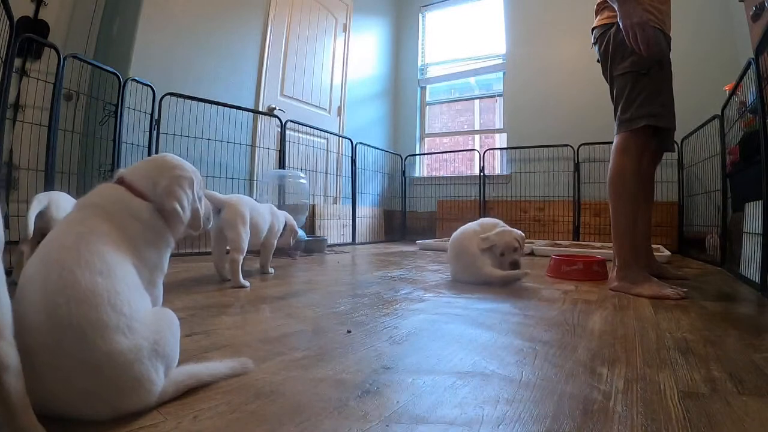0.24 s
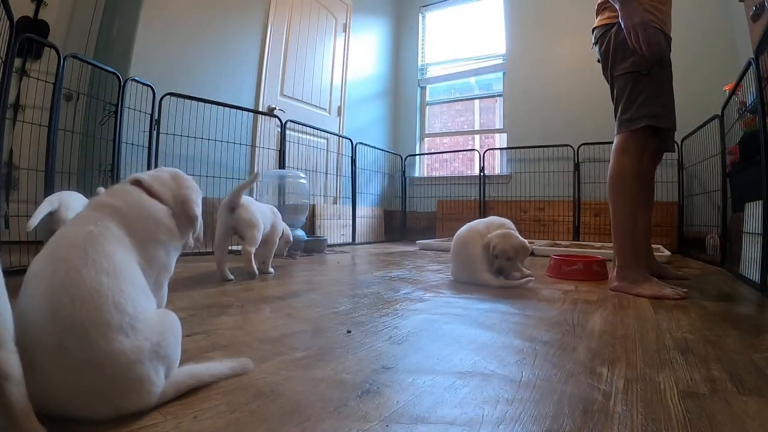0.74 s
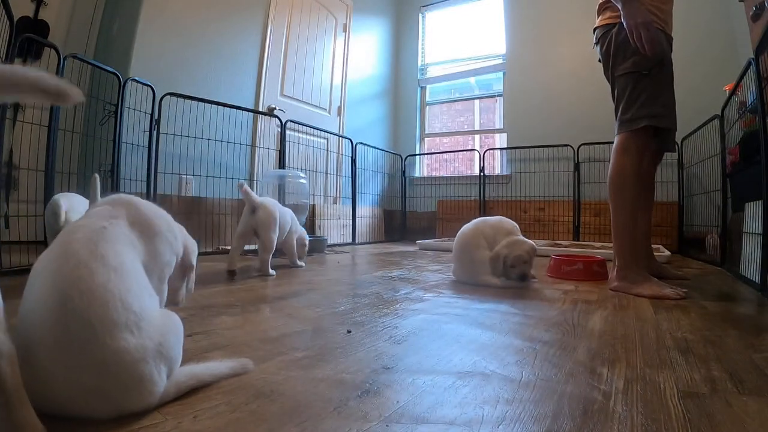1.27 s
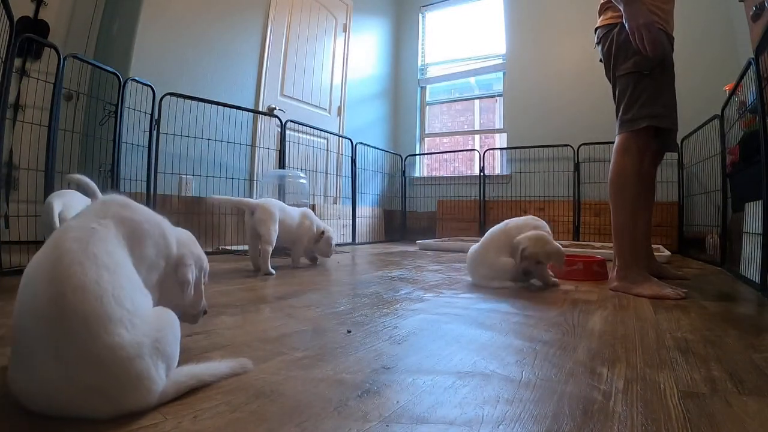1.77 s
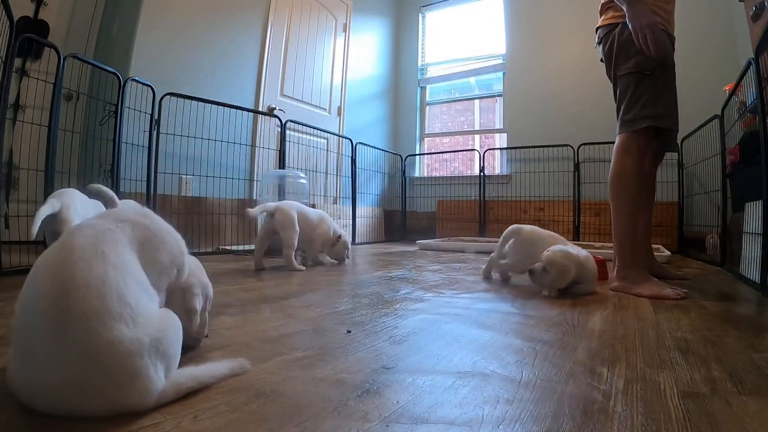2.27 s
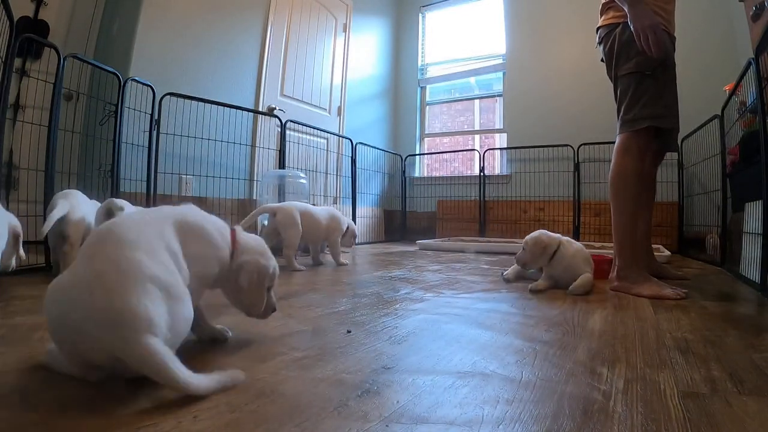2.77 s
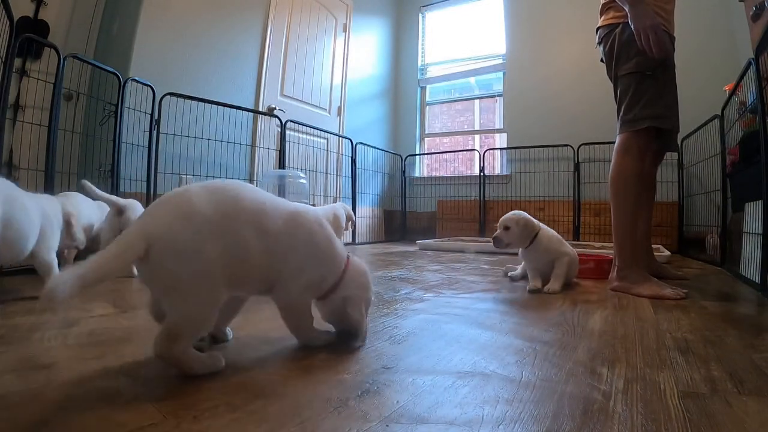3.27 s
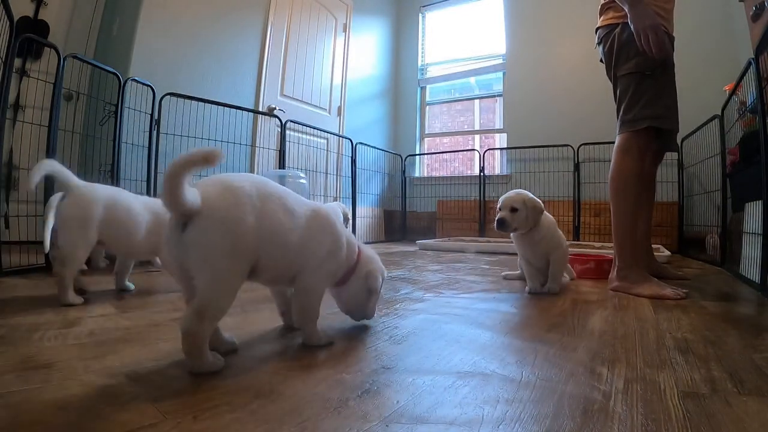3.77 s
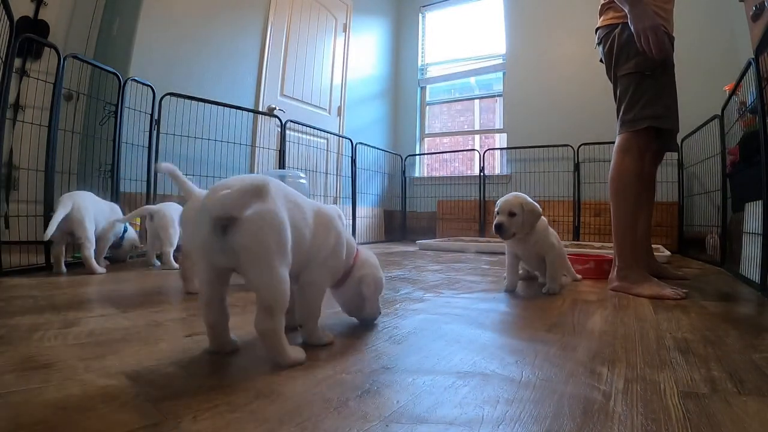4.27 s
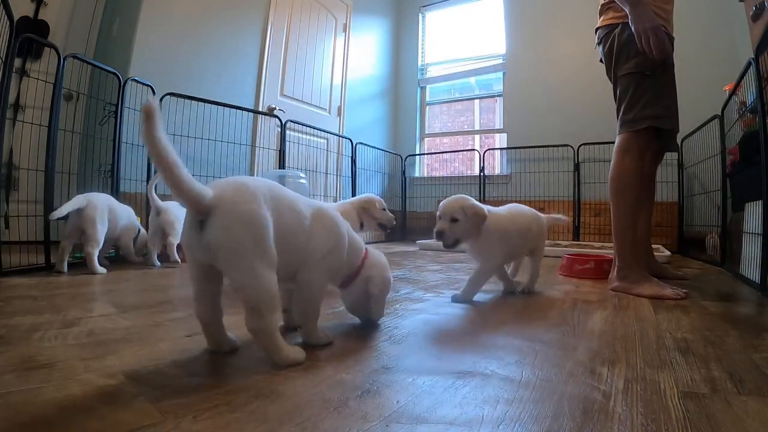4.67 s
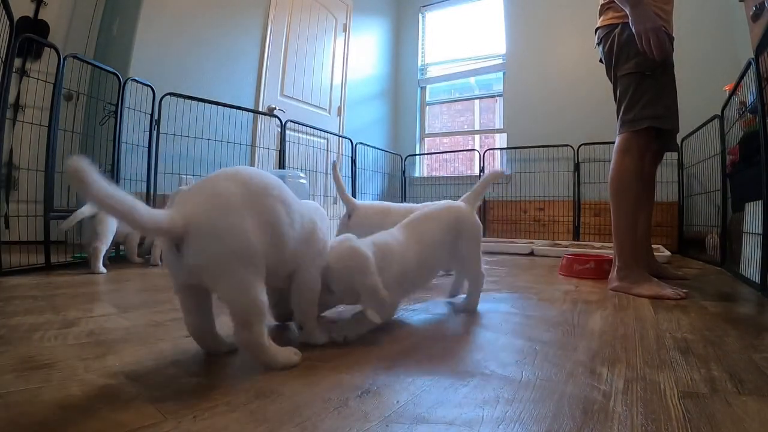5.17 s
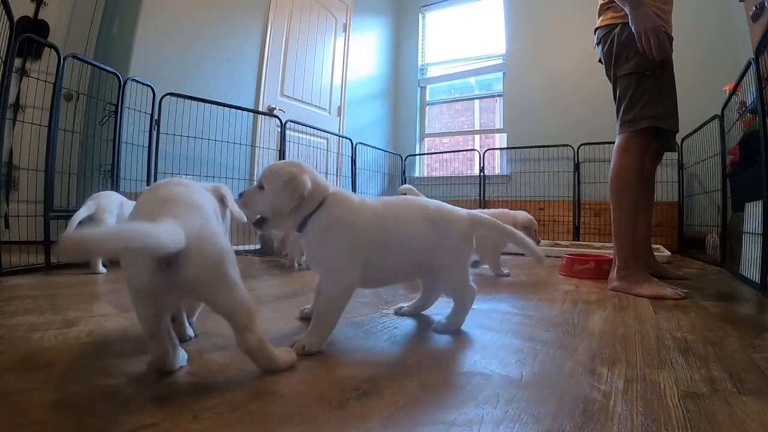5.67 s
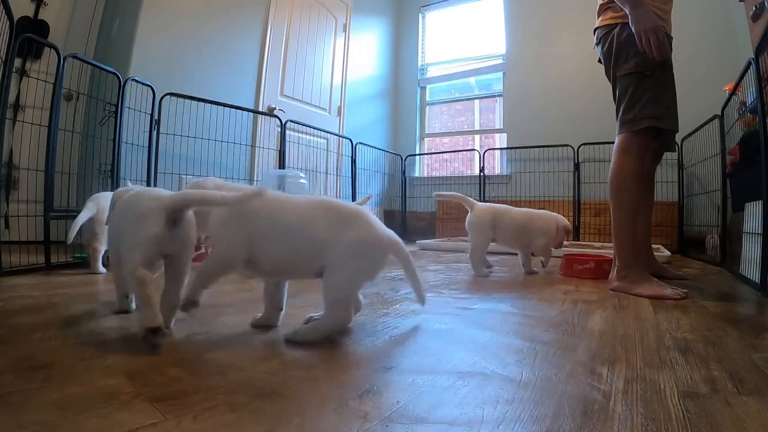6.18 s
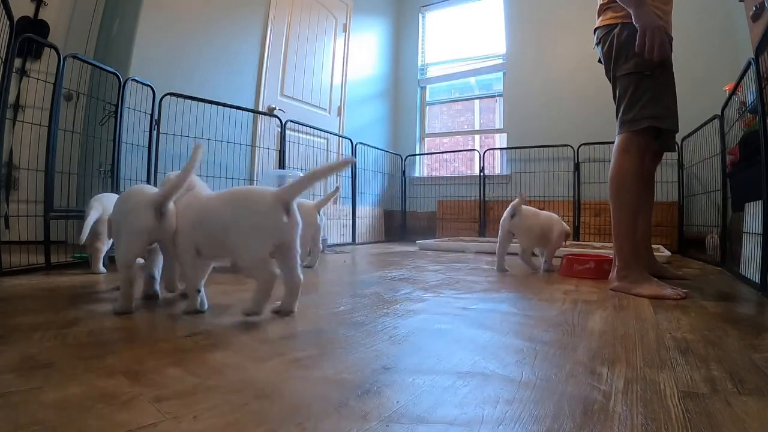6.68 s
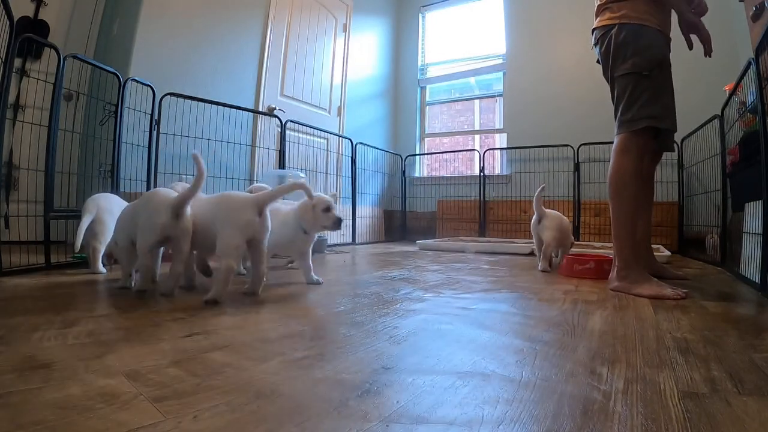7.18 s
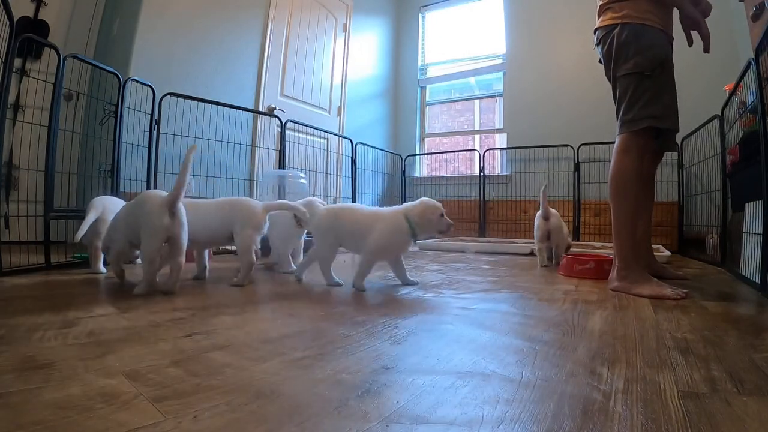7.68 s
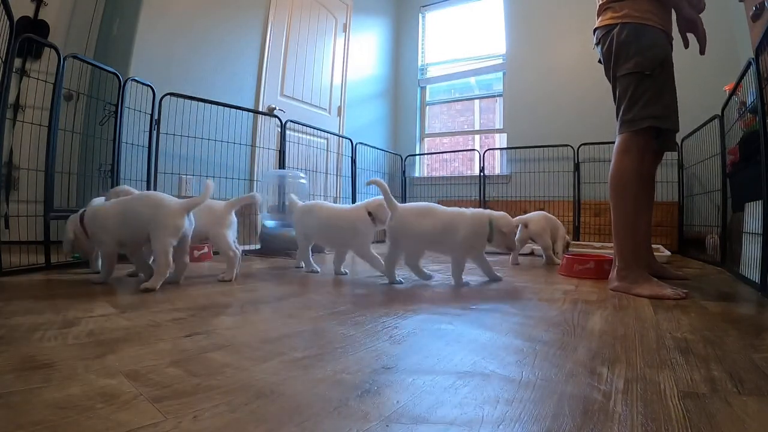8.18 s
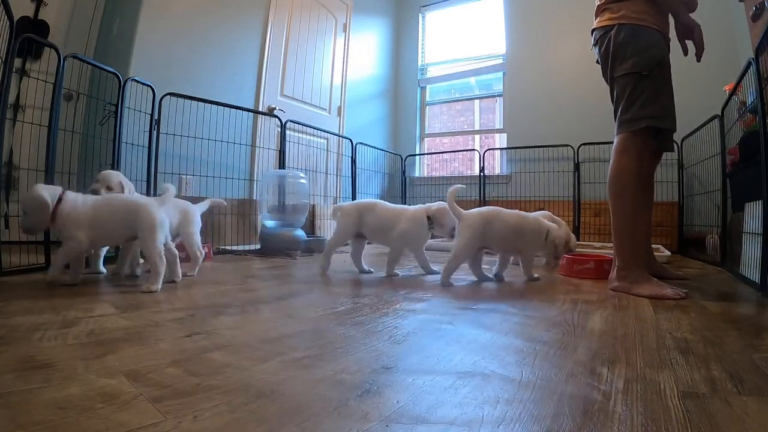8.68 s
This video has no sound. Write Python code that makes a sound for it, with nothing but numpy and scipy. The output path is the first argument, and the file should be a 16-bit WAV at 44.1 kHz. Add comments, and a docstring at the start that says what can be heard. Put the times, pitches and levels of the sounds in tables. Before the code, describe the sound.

Puppy paws scuff and slide on a wooden floor, with irregular claw clicks and soft thuds in a bare room.

```python
"""Puppies' pads and fur scuff along a hard plank floor in a bare, tall room, heard from floor height.
Stick and slip makes dense grains, coloured by the boards; dragged claws catch on the grain.
Claws tick and skid into the board modes; paws and rumps thud into the joists, which murmur under
soft steps. The room rings after every contact over a faint steady hush."""
import sys
import numpy as np
from scipy import signal
from scipy.io import wavfile
from scipy.ndimage import uniform_filter1d

SR = 44100
rng = np.random.default_rng(int(sys.argv[2]) if len(sys.argv) > 2 else 0)


def store_wav(level_fs):
    """Save 16-bit WAV to argv[1]."""
    pcm = np.round(np.clip(np.atleast_2d(level_fs), -1, 1) * 32767)
    wavfile.write(sys.argv[1], SR, pcm.T.astype(np.int16))


N = 393857

# claw landings: t/s, tap/dB, left lean/dB, centre f/Hz, sharp edge/dB, skid/s
CLAW_TICKS = [(0.213, -53, -2, 2500, -64, 0.002), (0.252, -30, -1, 1590, -61, 0.0099),
              (0.374, -21.5, 4, 1180, -59, 0.008), (0.3913, -26, 20, 1300, -62, 0.0057),
              (0.475, -36, 4, 2500, -49, 0.0037), (1.035, -30, -15, 2470, -53, 0.0042),
              (1.2756, -41.5, -1, 2500, -45.5, .005), (1.589, -26, 4, 1190, -60, 0.018),
              (1.607, -18, 3, 902, -46, 0.015), (1.6171, -14.5, 8, 1660, -43, 0.013),
              (1.63, -26, 3, 1500, -45, 0.0046), (1.6831, -20, -3, 2230, -56, 0.021),
              (1.8575, -33, 3, 1300, -59, 0.0047), (2.001, -31, -17, 1240, -57, 0.011),
              (2.1095, -17.5, -1, 1220, -74, 0.0052),  (2.722, -29, -1, 2000, -52, .008),
              (2.846, -29, 10, 1300, -43.5, 0.033), (2.975, -20.5, 9, 3670, -41.5, 0.0048),
              (3.055, -25.5, -1, 1000, -44, 0.024), (3.229, -15, 8, 1220, -45, 0.011),
              (3.319, -21, 10, 2850, -43.5, 0.0041), (3.491, -20, 10, 795, -58, 0.0069),
              (3.5562, -17, 6, 2040, -44.5, 0.024), (3.693, -28, 1, 1770, -35, 0.002),
              (3.832, -49, 4, 1970, -52.5, 0.021), (4.048, -34, 10, 2030, -45, 0.025),
              (4.153, -35, 2, 2120, -49, .008), (4.1706, -27, 6, 2030, -41, 0.0056),
              (4.3065, -26, 4, 1740, -65, 0.012), (4.575, -47, -2, 2480, -56, 0.011),
              (4.595, -36, 2, 2040, -52.5, 0.019), (4.6835, -25, 4, 1270, -43.5, 0.0072),
              (4.7001, -18.5, 5, 1900, -48, 0.0038), (4.912, -24, 5, 945, -52, 0.0037),
              (4.938, -18, 4, 650, -65, 0.0089), (5.0424, -39, 2, 2000, -63, 0.0044),
              (5.1, -17, 1, 470, -61, 0.004), (5.222, -17.5, -1, 1120, -42, 0.015),
              (5.2794, -16, 2, 630, -50, 0.0079), (5.36, -23, 1, 1580, -60, 0.0035),
              (5.6325, -33, -19, 2440, -50.5, 0.011), (5.6743, -33, -6, 1660, -44, 0.011),
              (5.7943, -13.5, 7, 2270, -44, 0.0059), (5.806, -13, 4, 2250, -50, 0.0046),
              (6.1324, -34.5, -1, 1210, -67, 0.0085), (6.146, -23, -5, 1370, -42.5, 0.02),
              (6.1653, -14.5, 5.5, 1880, -39, 0.004), (6.2692, -29, 18, 1670, -48, 0.006),
              (6.5332, -24, 3.5, 1270, -60, 0.0091), (6.584, -18, 6, 1500, -41.5, 0.0093),
              (6.622, -21.5, -11, 1160, -54, 0.014), (6.8205, -17, 2, 1160, -41.5, 0.0091),
              (6.9723, -15.5, 5, 1350, -39, 0.0038), (7.056, -24, 1, 2320, -39.5, 0.0064),
              (7.1459, -28, 3, 1220, -41.5, 0.0072), (7.2, -20, 21, 1230, -50, 0.0081),
              (7.4134, -30, -10, 1330, -74, 0.011), (7.445, -30.5, 12, 2280, -61, 0.013),
              (7.471, -32, 13, 1070, -47, 0.0046), (7.8211, -27, 7, 990, -50, 0.016),
              (8.174, -25.5, 1, 1560, -49, 0.018), (8.2493, -29, 3, 2470, -41, 0.0083),
              (8.4208, -26.5, 6, 1230, -52, .006), (8.56, -23, 5, 1030, -58, .006),
              (8.591, -25, 3, 1030, -60, 0.0063), (8.8205, -34, -5, 1630, -57, 0.012),
              (8.8517, -22, 2, 1210, -52, 0.014)]
# joist modes: f/Hz, level/dB, t60/s
JOIST_MODES = [(63.6, -1, 0.35), (84, -8, 0.45), (97.8, 0.5, 0.19), (128.4, -5.5, 0.43), (163.4, 2, 0.25),
               (173, -2, 0.14), (200.6, 1.5, 0.13), (253, 2, 0.05), (311, 3.5, 0.043), (430, 6, 0.036),
               (506, 6.5, 0.02), (655, 7, 0.012), (840, -3, 0.0097)]


def from_db(db):
    """Decibels to gain."""
    return 10 ** (np.asarray(db) / 20)


def rms_one(x):
    """Scale to rms 1."""
    return x / np.sqrt(np.mean(x ** 2) + 1e-20)


def lean(db):
    """Left and right gains, left louder by db."""
    return from_db(np.array([db / 2, -db / 2]))


def in_time(rows):
    """Each column of a curve at every sample."""
    times_s, *columns = np.transpose(rows)
    return [np.interp(np.arange(N) / SR, times_s, c) for c in columns]


def at_hz(points, hz):
    """Read a table on a log-frequency axis."""
    return np.interp(np.log(hz), np.log(np.array(points)[:, 0]), np.array(points)[:, 1])


def shelf(ratio, octaves):
    """Ramp from 0 to 1 over the octaves above frequency ratio 1."""
    return np.clip(np.log2(ratio) / octaves, 0, 1)


def bump(hz, centre_hz, octaves):
    """Bell weight of hz around a moving centre."""
    weight = np.exp(-(np.log2(hz / centre_hz[..., ::32]) / octaves) ** 2)
    return np.repeat(weight, 32, axis=-1)[..., :N]


def drift(corner_hz):
    """Slow random curve, rms 1."""
    r = np.exp(-80 * np.pi * corner_hz / SR)
    slow = signal.lfilter([1], [1, -2 * r, r * r], rng.standard_normal(N // 40 + 2002))[2000:]
    return np.interp(np.arange(N) / 40, np.arange(len(slow)), rms_one(slow))


def ring(clicks, hz, t60_s):
    """A unit click starts a decaying sine of height 1."""
    r, w = from_db(-60 / (t60_s * SR)), 2 * np.pi * hz / SR
    return signal.lfilter([0, np.sin(w)], [1, -2 * r * np.cos(w), r * r], clicks + 1e-18)


def bands(pairs, low_hz, step_octaves):
    """Yield centre and stereo band of two (mid, side) pairs; neighbours take unrelated pairs."""
    likeness = [(30, 0.92), (120, 1), (250, 0.91), (500, 0.89), (1000, 0.71), (2000, 0.59), (4000, 0.24),
                (8000, 0.018)]   # stereo field: f/Hz, left-right correlation
    balance = [(60, 1), (180, -1.5), (550, 1), (1650, 3.5), (4970, 2), (15000, -3)]   # stereo balance: f/Hz, left lean/dB
    edges = low_hz * 2 ** np.arange(0, np.log2(17000 / low_hz), step_octaves)
    for k, (low, high) in enumerate(zip(edges, edges[1:])):
        bandpass = signal.butter(2, [low, high], "band", fs=SR, output="sos")
        mid, side = signal.sosfilt(bandpass, pairs[k % 2])
        hz = np.sqrt(low * high)
        alike = np.clip(at_hz(likeness, hz), -1, 1)
        stereo = np.sqrt(1 + alike) * mid + np.sqrt(1 - alike) * side * [[1], [-1]]
        yield hz, stereo * lean(at_hz(balance, hz))[:, None]


def hush():
    """Steady air and house noise."""
    spectrum = [(12, -38), (20, 7), (59, 10), (112, 3.5), (161, 4), (315, -5.5), (707, -8.5), (1010, -5),
                (1680, -4.5), (3970, -14.5), (7540, -16), (12400, -88), (15600, -62)]   # noise density: f/Hz, level/dB
    noise_bands = bands(rng.standard_normal((2, 2, N)), low_hz=20.94, step_octaves=0.6003)
    return from_db(-52) * rms_one(sum(band * from_db(at_hz(spectrum, hz)) for hz, band in noise_bands))


def room(x, onset_s):
    """Dense reflections, each band dying at its own rate."""
    decay = [(100, 0.4), (500, 0.48), (1400, 0.78), (3700, 0.66), (9700, 0.61)]   # reverberation: f/Hz, t60/s
    t = np.arange(SR) / SR
    noise_bands = bands(rng.standard_normal((2, 2, SR)), low_hz=40.8, step_octaves=0.4948)
    tail = sum(band * from_db(-60 * t / at_hz(decay, hz)) for hz, band in noise_bands)
    tail = tail * np.clip(t / onset_s, 0, 1) / np.sqrt(np.sum(tail ** 2) / 2)
    return signal.fftconvolve(x[None], tail, axes=1)[:, :N]


def treading():
    """Many soft steps keep the low joist modes murmuring, a little differently on each side."""
    tread = [(0.0, -42), (0.32, -47), (0.65, -49.5), (1.59, -52), (2.06, -45.5), (2.51, -32.5), (2.93, -48),
             (3.45, -55), (3.68, -41), (4.4, -47), (5.0, -42), (5.8, -67), (6.44, -39), (6.69, -98),
             (6.91, -39), (7.2, -44), (7.54, -55), (7.8, -44), (8.01, -46), (8.14, -46), (8.5, -50),
             (8.65, -46), (8.93, -47.5)]   # murmur of the joists: t/s, level/dB
    push = rng.standard_normal((2, N)) * from_db(3.8 * drift(2.0))
    mid, side = sum(ring(push, hz, t60_s) * from_db(db) for hz, db, t60_s in JOIST_MODES[:7])
    return from_db(in_time(tread)[0] - 3) * rms_one(mid + from_db(-11) * side * [[1], [-1]])


def thudding(sag, scatter_db):
    """A soft paw loads its board, which swells and sags in pitch; first contact knocks the joists."""
    thuds = [(0.014, -40.5, 125, -57, -59), (0.255, -51, 171, -51, -65), (0.574, -44.5, 270, -49, -73),
             (0.718, -38.5, 257, -43, -68), (1.254, -39.5, 170.6, -39.5, -58), (1.817, -40, 174, -61, -72),
             (1.888, -44, 254, -47, -80), (2.041, -44, 155, -41.5, -43), (2.08, -53, 120, -49, -72),
             (2.198, -45, 255, -48, -77), (2.291, -41, 173, -40.5, -48), (2.393, -31.5, 256, -51, -61),
             (2.751, -28, 171, -41, -45), (2.788, -37.5, 174, -40.5, -59), (3.117, -46.5, 186, -40.5, -60),
             (3.232, -45, 251, -46, -55), (3.49, -28, 160, -43, -36.5), (3.883, -50, 182, -45, -59),
             (4.056, -39, 172, -65, -69), (4.188, -28, 160, -41, -41), (4.226, -40, 123, -53, -56),
             (4.354, -44, 162, -75, -58), (4.678, -43, 163, -49, -50), (4.942, -34, 100, -40.5, -39),
             (4.978, -55, 120, -46, -53), (5.044, -39, 91, -39, -47), (5.1, -43, 150, -47, -70),
             (5.167, -40, 150, -46, -56), (5.275, -37, 191, -29.5, -43), (5.432, -42, 151, -47, -68),
             (5.652, -42.5, 173, -56, -63), (5.855, -40.5, 171.7, -46, -57), (6.057, -42, 88.5, -50, -56),
             (6.251, -42, 154, -39.5, -46), (6.362, -41, 127, -62, -54), (6.444, -31.5, 123, -43, -39),
             (6.596, -42.5, 212, -48, -45), (6.821, -63, 330, -42, -80), (6.964, -48, 165, -41, -74),
             (7.026, -40, 301, -47, -55), (7.072, -36, 172, -39, -52), (7.149, -31, 138, -46, -42),
             (7.429, -39, 138, -49, -53), (7.741, -39, 170.6, -46.5, -50), (7.888, -28.5, 134, -52, -52),
             (7.935, -26.5, 128, -42, -48), (8.179, -36.5, 147, -37.5, -68), (8.234, -28, 134, -48, -42),
             (8.426, -26.5, 138, -43, -73), (8.477, -31, 149, -51, -49), (8.521, -30.5, 147, -66, -52)]   # paw landings: t/s, swell/dB, board f/Hz, hard knock/dB, deep boom/dB
    toes, toe_spread_s, toe_loss_db = 4, 0.015, 14
    load_s, pad_contact_s, lean_spread_db = 0.029, 0.00046, 3
    mode_hz, modes = np.array(JOIST_MODES)[:, 0], np.arange(len(JOIST_MODES))
    t = np.arange(SR // 2) / SR
    boards, knocks = np.zeros((2, N + len(t))), np.zeros((len(modes), N + SR))
    scatter = rng.standard_normal((len(thuds), len(modes) + 1))
    wobble, slip = np.pad([drift(20), drift(5)], [(0, 0), (0, SR)])   # shifting weight: level, phase
    toe_lags = rng.random((len(thuds), toes))
    toe_forces = rng.standard_normal((len(thuds), toes, len(modes)))
    high = shelf(mode_hz / 90, octaves=1.67)
    travel = (SR * (0.003 + 0.05 / np.sqrt(mode_hz))).astype(int)   # bending waves: highs arrive first
    for thud, chance, lags, forces in zip(thuds, scatter, toe_lags, toe_forces):
        start_s, swell_db, hz, knock_db, deep_db = thud
        at = round(start_s * SR)
        span = slice(at, at + len(t))
        load = t / load_s * (hz / 150) ** 0.26   # deeper boards load more slowly
        swell = load ** 1.15 * np.exp(2 * (1 - load)) * from_db(swell_db + 2 * wobble[span])
        tone = np.sin(2 * np.pi * (hz * t * (1 - sag * t) + 0.15 * slip[span]))
        boards[:, span] += np.outer(lean(lean_spread_db * chance[-1]), swell * tone)
        # soft pads lose the top
        dull_db = min(knock_db + 33, 0) * 0.55 * np.maximum(np.log2(mode_hz / 220), 0)
        blow_db = high * (knock_db + 5) + (1 - high) * (deep_db + 6)
        blow = from_db(blow_db + dull_db + scatter_db * chance[:-1])
        knocks[modes, at + travel] += blow
        for lag, force in zip(lags, forces):
            toe = blow * high * force * from_db(-toe_loss_db * (1 + lag) / 2)
            knocks[modes, at + travel + int(lag * toe_spread_s * SR)] += toe
    soft = np.exp(-1 / (pad_contact_s * SR))
    knocks = signal.lfilter([1 - soft], [1, -soft], knocks[:, :N] + 1e-18)
    joists = sum(ring(knocks[k], hz, t60_s) * from_db(db) * (-1) ** k
                 for k, (hz, db, t60_s) in enumerate(JOIST_MODES))
    return boards[:, :N] + joists


def claws(spot_octaves, roughness, scatter_db):
    """A tick and a gritty skid drive the board modes; returns direct sound and what reaches the walls."""
    board_modes = [(446, -15.5, 0.023), (680, -10.5, 0.01), (995, -1, 0.0041), (1300, -2, 0.0091),
                   (1684, -3.5, 0.0081), (1916, 2.5, 0.0062), (2190, 5.5, 0.0026), (3040, 6, 0.0031),
                   (4000, 7, 0.0023), (5620, 3, 0.0019), (7730, -2, 0.0028), (11000, -11, 0.0014),
                   (13100, -13, 0.0011), (14600, -26, 0.00078)]   # board surface: f/Hz, level/dB, t60/s
    crisp_s, grip_share, far_tap_db, spot_t60_s = 0.006, 0.3, -28.5, 0.036
    out, length = np.zeros((3, N)), SR // 25   # left, right, walls
    t = np.arange(length) / SR
    scatter = rng.standard_normal((len(CLAW_TICKS), len(board_modes)))
    grits = rng.standard_normal((len(CLAW_TICKS), length))
    for k, (hz, mode_db, t60_s) in enumerate(board_modes):
        push, high = np.zeros((3, N + length)), shelf(hz / 2900, octaves=0.62)
        for tick, chance, grit in zip(CLAW_TICKS, scatter[:, k], grits):
            start_s, tap_db, lean_db, centre_hz, edge_db, skid_s = tick
            force = roughness * (1 + 1.62 * high) * grit * np.exp(-(t / skid_s) ** 2)
            force *= 1 - np.exp(-t / (grip_share * skid_s))
            # long skids begin with a softer tick
            force[0] = (1 - 0.28 * high) * min(crisp_s / skid_s, 1) ** (0.97 * high)
            # the spot struck favours nearby modes; the horn tip excites the top ones
            detune_db = -6 * min(abs(np.log2(hz / centre_hz)) / spot_octaves, 2.2)
            blow_db = (1 - high) * (tap_db + detune_db) + high * (edge_db + 12.5)
            force *= from_db(blow_db + mode_db + scatter_db * chance)
            # louder taps are nearer, so drier; the thin edge hardly reaches the walls
            walls = from_db(0.58 * (far_tap_db - tap_db) - 9 * high)
            at = round(start_s * SR)
            push[:, at:at + length] += np.outer([*lean(lean_db), walls], force)
        out += ring(push[:, :N], hz, t60_s) * (-1) ** k
    for start_s, tap_db, lean_db, centre_hz, *_ in CLAW_TICKS:   # each spot rings at its own pitch
        spot = from_db(tap_db - 8.5 - 60 * t / spot_t60_s) * np.sin(2 * np.pi * centre_hz * t)
        at = round(start_s * SR)
        out[:2, at:at + length] += np.outer(lean(lean_db), spot)
    return out[:2], out[2]


def slide_curves():
    """Slides rise, hold and let go; returns their summed level and power-weighted colours in dB."""
    # pad and fur slides: t/s, rise/s, hold/s, level/dB, weight/dB, low ring/dB, high ring/dB, bright/dB
    slides = [(-0.02, 0.015, 0, -38.5, -16, -2.5, -4, -14.5), (0.222, .03, 0.087, -46, -7.5, -11, -29, -20),
              (0.35, 0.025, 0.25, -38, -9.5, -7, -10, -21.5),
              (0.486, 0.15, 0.13, -32.5, -7.5, -12.5, -9, -20.5),
              (0.73, 0.026, 0.29, -35.5, -12.5, -11.5, -10.5, -17.5),
              (1.02, 0.16, 0, -27.5, -5.5, -15.5, -11.5, -20), (1.146, 0.027, 0.016, -34, -4, 14, -7, -32),
              (1.263, 0.044, 0.065, -34, -19, -13.5, -11.5, -15),
              (1.388, 0.082, 0.068, -39, -18, -12.5, -12, -16),
              (1.58, 0.017, 0.0025, -34, 3, -12, -25, -17),
              (1.661, 0.04, 0.0089, -31.5, -16.5, -14, -12, -18.5),
              (1.74, 0.046, 0.039, -41.5, -4, -1, -7, -36),
              (1.844, 0.026, 0.049, -36.5, -7.5, -10, -8.5, -18),
              (1.953, 0.04, 0.022, -38, -10.5, -14, -4.5, -5.5), (2.064, 0.065, 0.078, -43, 2, -9, -9, -20),
              (2.144, 0.028, 0.087, -45, -15, 2, -5, -15), (2.27, 0.086, 0.055, -41, -14, -16, -9, -9.5),
              (2.399, 0.032, 0.031, -38, -1, 10, -7, -18), (2.425, 0.046, 0.022, -27, -9.5, -9, -7, -15.5),
              (2.654, 0.087, 0.069, -40, 6, -3.5, -4, -21), (2.828, 0.039, 0.069, -29, -16, -6.5, -5, -16),
              (3.199, 0.0093, 0.12, -40.5, -4.5, -8, -2, -9), (3.46, 0.035, 0.11, -46, 8, 4, 6, -12),
              (3.546, 0.052, 0.014, -41, -8, -8, -2, -3),
              (3.624, 0.045, 0.072, -31.5, -4, -5.5, -0.5, -26.5),
              (3.795, 0.045, 0.044, -37.5, -3.5, -6, 2.5, -4), (3.894, .06, 0.12, -38.5, -4.5, -3, 3, -27),
              (4.034, 0.021, 0.047, -34, -4, -7, 0.5, -18),
              (4.123, 0.048, 0.025, -29.5, -5.5, -4.5, -0.5, -16),
              (4.275, 0.034, 0.025, -40, -34, -1.5, -2, -8),
              (4.548, 0.036, 0.037, -39.5, -12, -7, -3.5, -11),
              (4.647, 0.02, 0.047, -45.5, 1, -5, -11, -11),
              (4.782, 0.12, 0.029, -37.5, -13, -11.5, -2.5, -7),
              (5.036, 0.13, 0.0026, -36, -5.5, -8.5, -7.5, -11.5),
              (5.177, 0.051, 0.078, -40, -1.5, -9, -6, -11), (5.29, .03, 0.18, -53.5, -12, -19, -1, 7),
              (5.458, 0.05, 0.034, -53.5, 0, -12, -2, 14), (5.523, 0.049, 0.01, -47.5, -2, 2.5, 0, -37),
              (5.585, 0.021, 0.058, -42, -16, -10.5, -6.5, -2.5),
              (5.778, 0.024, 0.039, -34, -23, -13.5, 0, -24), (5.841, 0.011, 0.019, -36.5, 1, -2, 0, -9),
              (6.11, 0.031, 0.043, -39.5, -6.5, -9, -7, -7.5), (6.24, 0.019, 0, -49, 16, -15, -28, -5),
              (6.398, 0.13, 0.021, -43.5, 9.5, 3.5, 6, -13), (6.506, 0.068, 0.16, -36, -7.5, -7, -5, -12.5),
              (6.775, 0.045, 0.027, -34.5, -14, -8, -4, -14),
              (6.874, 0.061, 0.16, -40, -11, -11.5, -14.5, -14),
              (7.102, 0.052, 0.062, -42, 17, -9, -27, -42), (7.136, 0.034, 0.069, -36, -8.5, -7, 1.5, -4),
              (7.397, 0.02, 0.2, -43, -8.5, -8, -2.5, -7), (7.487, 0.16, 0.071, -39.5, -17, -7, -9, -12),
              (7.786, 0.047, 0.015, -34.5, -12, -6, -7, -11),
              (7.847, 0.056, 0.064, -32, -14, -7.5, -5.5, -12),
              (8.183, 0.053, 0, -36.5, -2.5, -9, -6, -11.5),
              (8.426, 0.042, 0.021, -32.5, -13, -11, -12.5, -17),
              (8.532, 0.066, 0.085, -35.5, -14, -6, -3, -10),
              (8.792, 0.033, 0.05, -33.5, -28, -15, -7, -13.5)]
    rise_db, release_db_per_s, ring_fade_db_per_s = 14, 108.5, 21
    start_s, rise_s, hold_s, level_db, *colours = np.transpose(slides)[:, :, None]
    t = np.arange(0, N + 64, 64) / SR
    age_s = t - start_s
    slowing_s = np.maximum(age_s - rise_s - hold_s, 0)
    lost_db = rise_db * np.maximum(1 - age_s / rise_s, 0) + release_db_per_s * slowing_s
    power = from_db(2 * np.maximum(level_db - lost_db, -120))
    # a slowing slide loads and rings the boards less
    colours[:3] = [c - ring_fade_db_per_s * np.minimum(slowing_s, 0.15) for c in colours[:3]]
    total = power.sum(axis=0)
    blended = [(c * power).sum(axis=0) / total for c in colours]
    return in_time(np.transpose([t, 10 * np.log10(total), *blended]))


def held_until_landing(level_db, wait_s, jump_s):
    """A slide cannot grow just before a claw lands: the level waits, then jumps."""
    clock = np.arange(N)
    for landing_s, *_ in CLAW_TICKS:
        start = max(round((landing_s - wait_s) * SR), 0)
        clock[start:round(landing_s * SR)] = clock[start]
    return uniform_filter1d(np.minimum(level_db, level_db[clock]), size=round(jump_s * SR))


def catching(rings_db, rings_hz, edge_db, per_s, uneven_db, t60_s):
    """A dragged claw catches on the grain; each catch ticks and rings two moving board resonances."""
    sizes = from_db(uneven_db * np.minimum(rng.exponential(1, N), 3)) * rng.choice([-1, 1], N)
    catches = sizes * (rng.random(N) < per_s / SR)
    edge_band = signal.butter(2, [2500, 7000], "band", fs=SR, output="sos")
    out = from_db(edge_db) * rms_one(signal.sosfilt(edge_band, catches + 1e-18))
    r = from_db(-60 / (t60_s * SR))
    for ring_db, hz in zip(rings_db, rings_hz):
        turn = np.exp(2j * np.pi * np.cumsum(hz) / SR)
        ringing = np.imag(turn * signal.lfilter([1], [1, -r], catches / turn + 1e-18))
        out += from_db(ring_db) * rms_one(ringing)
    return out


def scuffing(grains_per_s, uneven_db, ring_octaves, patchy_db):
    """Pads stick and slip in dense grains; weight fills the lows, dry hair and claw edges the highs."""
    spectrum = [(120, -31), (200, 0), (365, -3), (619, -2.5), (1030, -2.5), (1540, -2), (2020, -8.5),
                (2520, -3), (3820, -4), (7640, -16), (8680, -27), (12700, -36.5), (15600, -63)]   # friction noise density: f/Hz, level/dB
    resonances = [(0, 1180, 2010), (0.42, 1270, 1930), (0.52, 1070, 2100), (0.6, 1250, 2050),
                  (0.7, 1250, 1990), (1.04, 1210, 2040), (1.2, 1090, 1980), (1.6, 1320, 1760),
                  (1.72, 1080, 2170), (2.3, 1290, 1960), (2.42, 1050, 2020), (2.55, 1090, 1960),
                  (2.87, 1290, 2020), (2.94, 1020, 1970), (3.6, 1150, 1950), (4.45, 1245, 1940),
                  (5.05, 1120, 2110), (5.54, 1350, 1740), (5.79, 1180, 2300), (5.85, 1140, 2050),
                  (5.92, 1100, 1930), (6.14, 1320, 1880), (6.91, 1120, 2010), (7.04, 1390, 2080),
                  (7.78, 1105, 1910), (8.5, 1250, 1880), (8.6, 1020, 1980), (8.93, 1240, 2030)]   # broad board resonances under the moving paws: t/s, low f/Hz, high f/Hz
    body = [(0.0, 552), (0.07, 300), (1.19, 480), (2.44, 291), (2.59, 648), (2.78, 322), (2.91, 760),
            (3.21, 396), (3.55, 385), (3.63, 730), (4.75, 343), (5.92, 546), (6.47, 330), (6.54, 675),
            (6.96, 340), (8.06, 504), (8.4, 300), (8.93, 626)]   # where the rubbing weight sounds in the boards: t/s, f/Hz
    position = [(0, 1), (1.0, -0.5), (2.0, -0.5), (2.6, 3), (3.2, 1.5), (3.8, 1.2), (4.4, 1.5), (5.2, -0.5),
                (5.8, 1), (6.5, 1), (7.2, 0), (8.2, 1), (8.93, 0.5)]   # place of the sliding paws: t/s, left lean/dB
    level_db, weight_db, low_ring_db, high_ring_db, bright_db = slide_curves()
    shape = (2, 2, N)
    sizes = from_db(uneven_db * np.minimum(rng.exponential(1, shape), 5)) * rng.choice([-1, 1], shape)
    grains = sizes * (rng.random(shape) < grains_per_s / SR)
    shared_flicker = drift(36)
    rings_hz = np.array(in_time(resonances)) * 2 ** (0.023 * np.array([drift(19), drift(20)]))
    body_hz = in_time(body)[0]
    rub = 0
    for hz, band in bands(grains, low_hz=230, step_octaves=1 / 4):
        low, high = bump(hz, rings_hz, ring_octaves)
        gain_db = at_hz(spectrum, hz) + patchy_db * (drift(15.6) + 0.41 * shared_flicker)
        gain_db += (weight_db + 5) * shelf(1000 / hz, octaves=0.17)
        gain_db += 5 * bump(hz, body_hz, octaves=0.48)
        gain_db += (low_ring_db + 11) * low + (high_ring_db + 11.5) * high
        gain_db += (bright_db + 15.5) * shelf(hz / 2600, octaves=2.17)
        rub = rub + band * from_db(gain_db)
    level_db = held_until_landing(level_db, wait_s=0.031, jump_s=0.011)
    catches = catching((low_ring_db, high_ring_db - 2.5), rings_hz, edge_db=0.69 * bright_db - 10,
                       per_s=350, uneven_db=3.0, t60_s=0.011)
    friction = rms_one(rub) + from_db(-4.5) * catches * lean(2.6)[:, None]
    return from_db(level_db) * friction * lean(in_time(position)[0])


def scene():
    """All contacts, their echo in the room and the hush."""
    scuff = scuffing(grains_per_s=6000, uneven_db=1.5, ring_octaves=0.31, patchy_db=2.0)
    ticks, ticks_to_walls = claws(spot_octaves=0.75, roughness=0.1, scatter_db=1.5)
    floor = thudding(sag=0.44, scatter_db=2.0) + treading()
    direct = from_db(-1.5) * scuff + from_db(-6.5) * ticks + from_db(-3) * floor * lean(0.93)[:, None]
    to_walls = from_db(-9) * scuff.mean(axis=0) + ticks_to_walls + from_db(-8) * floor.mean(axis=0)
    return direct + room(to_walls, onset_s=0.0012) + hush()


def record(dry):
    """The left port lies a sample farther; the microphone drops the deepest bass, the top is cut."""
    low_cut_hz, high_cut_hz = 45, 15700
    spaced = np.array([np.roll(dry[0], 1), dry[1]])
    thinned = signal.sosfilt(signal.butter(2, low_cut_hz, "high", fs=SR, output="sos"), spaced)
    return signal.sosfilt(signal.ellip(12, 0.5, 60, high_cut_hz, fs=SR, output="sos"), thinned)


dry = scene()
out = record(dry)
store_wav(out)
```